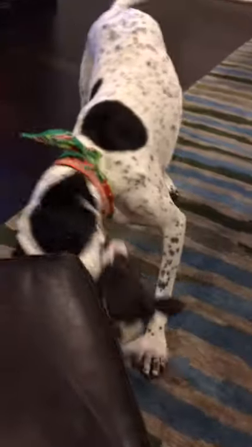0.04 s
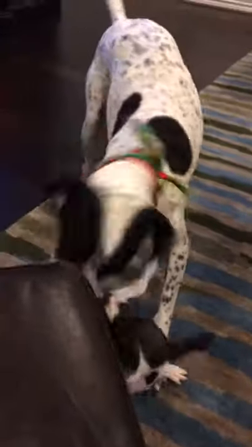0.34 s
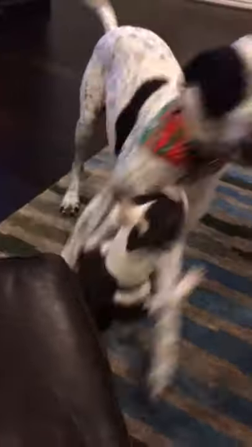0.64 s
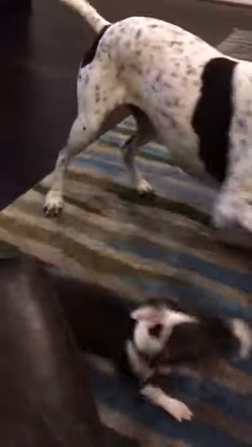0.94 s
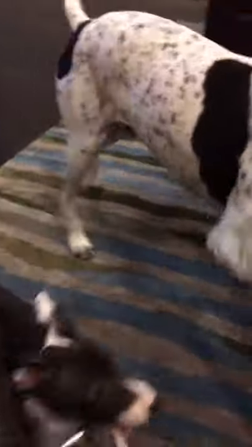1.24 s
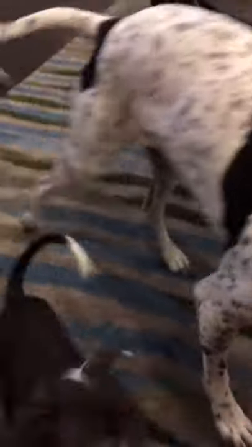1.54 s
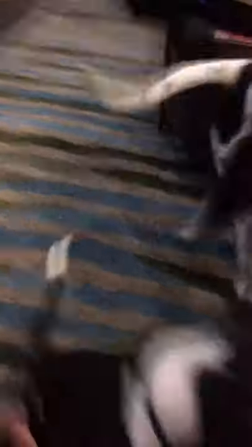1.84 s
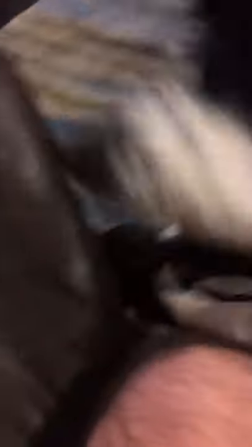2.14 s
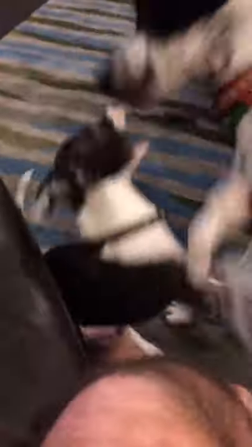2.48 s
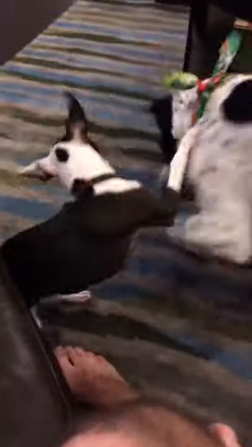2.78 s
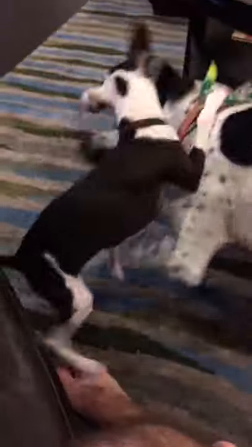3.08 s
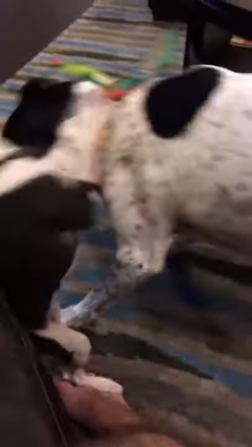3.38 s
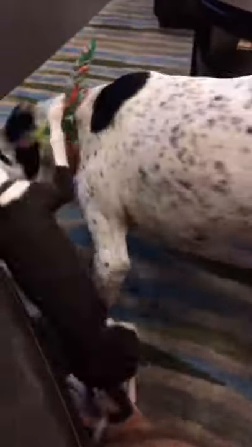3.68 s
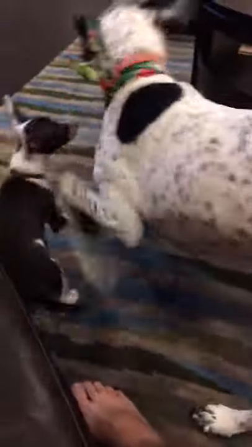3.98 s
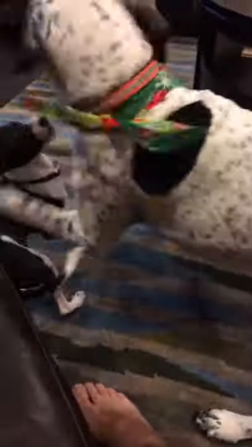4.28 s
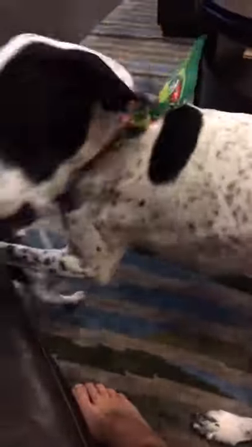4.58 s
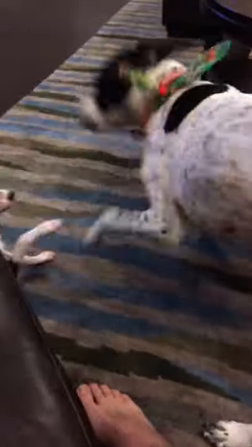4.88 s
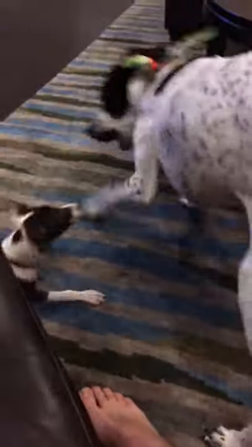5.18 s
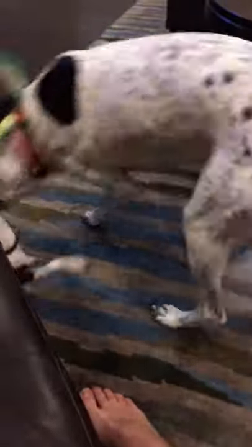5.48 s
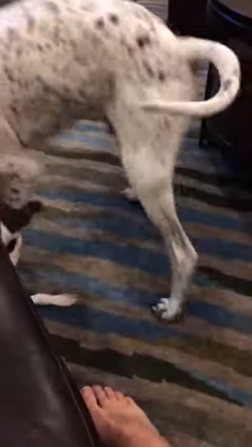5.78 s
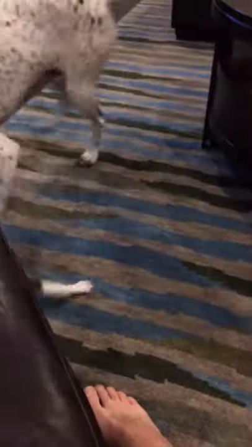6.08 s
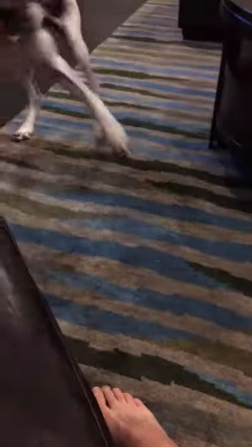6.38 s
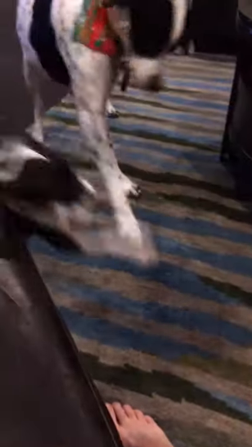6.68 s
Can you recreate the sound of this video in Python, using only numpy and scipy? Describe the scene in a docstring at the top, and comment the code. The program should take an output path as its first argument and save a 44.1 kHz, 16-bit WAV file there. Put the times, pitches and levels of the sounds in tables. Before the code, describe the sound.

Two dogs play-fight on carpet, close to a phone, in a room with a short echo. A metal collar tag clinks brightly and irregularly throughout, over faint shuffling, rustling fur and soft huffs. Three short, low growls fill the first second, with a sharp snap of teeth at 0.75 seconds. A loud, rough snarl runs from 1.3 to 1.8, briefly breaking into a whine. Around 2 seconds come dull thumps, snaps and a loud clink, then short growls until 2.6. A second snarl lasts from 2.9 to 3.3, followed by a clink and a whiny growl at 3.5. A strong knock at 4.1 starts the third snarl, ending in a sharp clink at 4.6. The dog snorts once near 4.9. The fourth snarl, edged with whines, runs from 5.6 to 6.2. A last short growl comes near 6.5, with jingling until 6.8.

```python
"""A low growl and the clink of collar tags: two dogs play-fight on a living-room carpet, near a phone. One
growls in short swells, snarls at length four times, may break into a whine, and snorts once. Its vocal folds
slap together and let air through, which sets its chest and throat ringing. The metal tags are struck with every
lunge; teeth snap, dull thumps sound, fur rustles, and the room adds a short echo."""
import sys
import numpy as np
from scipy import signal
from scipy.fft import rfft, irfft, next_fast_len
from scipy.io import wavfile
from scipy.ndimage import uniform_filter1d, map_coordinates

SR = 44100
rng = np.random.default_rng(int(sys.argv[2]) if len(sys.argv) > 2 else 0)


def dump(signal):
    """Clip the signal to [-1, 1] and save it as 16-bit WAV at the path in sys.argv[1]."""
    limited = np.clip(np.atleast_2d(signal).T, -1, 1)
    pcm = np.round(limited * 32767).astype(np.int16)
    wavfile.write(sys.argv[1], SR, pcm)


N = 305613

# Short growls, each swelling to one crest. Roughness and air (the share of breath noise) run from 0 to 1.
# start_s, rise_s, length_s, chest_db, mouth_db, teeth_db, swell_db, lip_curl_db, pitch_hz, roughness,
# air, then the throat's resonances: first_hz, second_hz, third_hz
GROWLS = [(-.03, 0.14, 0.28, -30.5, -42, -49.5, 1, -5, 116.5, 0.42, 0.75, 610, 870, 1540),
          (0.213, 0.15, 0.22, -32.5, -39.5, -52, 3, 11, 117.9, 0.49, 0.86, 680, 874, 1400),
          (0.741, 0.23, 0.33, -26, -29.5, -47, 14, 24.5, 104.1, 0.22, 0.6, 660, 908, 1630),
          (2.02, 0.032, 0.23, -21.5, -37, -36, 9, -50, 88.9, 0.32, 0.7, 599.8, 904, 1640),
          (2.218, 0.11, 0.21, -28.5, -44.5, -71, 10, -4, 84.54, 0.34, 0.99, 504, 980, 1477),
          (2.394, 0.094, 0.17, -26.5, -44.5, -67, 8, 36, 103.5, 0.68, 0.67, 750, 1015, 1780),
          (3.509, 0.11, 0.1665, -25, -35, -48, 9, -8, 113, 0.55, 0.42, 683.5, 880, 1822),
          (3.679, 0.031, 0.081, -35.5, -55, -56, 14, 8, 150.1, 0.22, 0.2, 684, 870, 1810),
          (6.361, 0.16, 0.26, -31.5, -39.5, -50.5, 5, 17.5, 86.14, 0.42, 0.96, 666, 946, 1514)]
# How strong the long snarls are, one list each: time_s, chest_db, mouth_db, teeth_db
SNARL_LEVELS = [
    [(1.32, -38, -30, -53), (1.33, -26, -37, -51), (1.38, -26, -19.5, -30.5), (1.436, -29, -23.5, -32),
     (1.51, -22, -17, -39), (1.532, -26, -16, -31.5), (1.574, -28, -24, -44), (1.6, -21.5, -20.5, -33),
     (1.678, -22, -25, -36.5), (1.7, -22, -19.5, -29), (1.726, -18.5, -30, -37), (1.754, -30, -25.5, -21),
     (1.81, -57, -52, -63)],
    [(2.92, -44, -66, -69), (2.934, -37, -48, -74), (2.944, -31, -50, -49), (2.964, -21, -30.5, -47),
     (2.98, -29, -25, -47), (3.048, -24.5, -35, -46), (3.054, -25.5, -23, -42.5), (3.12, -28, -36, -41.5),
     (3.182, -32, -26.5, -50), (3.224, -28.5, -37, -48), (3.248, -27, -31, -50), (3.298, -39, -47, -55),
     (3.33, -43, -56, -73)],
    [(4.11, -35, -42.5, -62), (4.132, -27, -41, -52), (4.214, -28, -37.5, -40.5),
     (4.374, -32, -42.5, -50.5), (4.436, -28, -42, -51), (4.44, -18.5, -39, -50),
     (4.446, -27.5, -35.5, -44), (4.482, -27.5, -27.5, -42), (4.488, -21.5, -23, -39),
     (4.522, -26.5, -31.5, -37), (4.534, -32, -26.5, -27), (4.564, -45, -49, -37.5), (4.59, -47, -47, -48)],
    [(5.575, -45, -65, -44), (5.587, -40, -47, -48), (5.605, -30, -20.5, -33), (5.687, -26.5, -32.5, -43.5),
     (5.747, -26.5, -30, -59), (5.791, -34, -24, -32), (5.817, -28, -35, -41), (5.865, -37, -31.5, -37),
     (5.935, -26.5, -34, -46), (6.003, -31.5, -25.5, -37), (6.053, -29, -27, -47.5),
     (6.115, -29, -30.5, -37.5), (6.22, -54, -55, -55)],
]
# Their voice, one list each: time_s, pitch_hz, roughness, air, first_hz, second_hz, third_hz
SNARL_VOICES = [
    [(1.33, 96.4, 0.3, 0.71, 585.8, 895, 1790), (1.39, 122, 0.79, 0.53, 618, 954, 1710),
     (1.44, 124.1, 0.79, 0.5, 584, 950, 1600), (1.53, 130.1, 0.96, 0.76, 537, 840, 1390),
     (1.68, 137.7, 0.58, 0.9, 523, 990, 1340), (1.74, 129.9, 0.6, 1, 637, 929.4, 1393),
     (1.79, 80.9, 0.63, 0.94, 730, 961, 1560)],
    [(2.96, 118.2, 0.74, 0.58, 742.5, 980.5, 1498), (3.06, 121.9, 0.82, 0.61, 734, 975.4, 1530),
     (3.12, 118.4, 0.78, 0.52, 729.3, 930, 1621), (3.18, 119.8, 0.71, 0.47, 673, 875, 1554),
     (3.28, 111.8, 0.75, 0.48, 690.3, 865, 1600)],
    [(4.13, 118.1, .8, 0.73, 641.5, 1005, 1499), (4.25, 100, 0.98, 0.73, 704.6, 1043, 1582),
     (4.4, 112.2, .9, 0.71, 653, 975.7, 1449), (4.48, 135.7, 0.92, 0.46, 632, 975.7, 1378),
     (4.54, 148.6, 1.02, 0.79, 753.4, 1066, 1537)],
    [(5.62, 112, .5, 0.4, 625, 738, 1760), (5.7, 108, 0.7, 0.39, 640, 750, 1799),
     (5.78, 110.3, 0.78, 0.4, 596, 700, 1502), (5.86, 115, 0.58, 0.5, 561, 1040, 1300),
     (5.96, 110.1, 0.5, 0.91, 668.8, 1015, 1351), (6.04, 109.8, 0.79, 0.5, 665.8, 958.5, 1371),
     (6.14, 110.4, 0.76, 0.84, 681, 1053, 1560)],
]
# High, arching whines: start_s, rise_s, length_s, top_pitch_hz, sag_hz_per_s, roughness, air
WHINES = [(1.466, 0.049, 0.097, 300.3, 280, 0.26, 0.16), (1.595, 0.021, 0.12, 267.6, 380, .34, 0.44),
          (3.591, 0.004, 0.16, 214.5, 310, 0.11, 0.36), (5.805, 0.071, .15, 247.1, 161, 0.2, 0.2),
          (5.99, 0.035, .08, 223.6, 11.7, 0.23, 0.2), (6.125, 0.022, 0.1, 224.5, 20, .2, 0.65)]
# A hard slap of the vocal folds with a brief push through the mouth: time_s, push_db
JOLTS = [(.986, 7), (1.399, 4.5), (2.996, 4.5), (4.466, 9), (4.487, 1.5), (5.606, -3), (5.64, 1.5),
         (5.719, 7.5), (5.779, 0)]
# How strong the snort is: time_s, mouth_db, teeth_db, nose_db
SNORT_LEVELS = [(4.815, -46, -66, -70), (4.835, -37, -48, -65), (4.856, -28.5, -33.5, -51),
                (4.888, -34, -39, -41), (4.906, -30, -36, -34.5), (4.945, -33, -39, -42),
                (4.975, -32.5, -42.5, -55), (5.01, -31, -54, -47), (5.025, -43, -53, -59),
                (5.08, -61, -68, -72)]
# Its resonances, shifting as the lips draw back: time_s, first_hz, second_hz, third_hz
SNORT_RESONANCES = [(4.83, 690, 1220, 2650), (4.87, 868, 1467, 2900), (4.91, 690, 1670, 3250),
                    (4.96, 630, 1620, 3260), (5.01, 850, 1680, 2600)]
# The tone of the hiss in the nose: frequency_hz, level_db
NOSE_TONE = [(2500, -21), (4900, 2), (6300, 3), (7400, -1), (12000, -3), (15000, -7.5)]
# Short breaths between growls: middle_s, length_s, level_db, resonance_hz
HUFFS = [(0.594, 0.14, -44.5, 667), (1.206, 0.36, -52, 800), (2.401, 0.07, -44, 950),
         (2.837, 0.07, -41, 726), (3.406, 0.14, -42.5, 734.6), (5.261, 0.21, -45.5, 849.5)]
# Hits on the tag. Low, main and high are its groups of notes; ring_share scales their ring time.
# time_s, peak_db, low_db, main_db, high_db, favoured_hz, ring_share
CLINKS = [(0.164, -28.5, -28, 0, -28, 11500, 0.61), (0.4357, -23, -16, -7, -7, 14000, 1),
          (0.5116, -27.5, -37, -11, -12, 13400, 0.38), (0.6385, -8.5, -7.5, -7, -1.5, 11250, 0.19),
          (0.6566, -15.5, -10, -5, -11, 11350, 0.18), (0.9367, -28, -34, -30, -14, 9960, 0.31),
          (1.15, -34, -8, -12, -5, 11330, 0.53), (1.3699, -18.5, -23, -9.5, -22, 12710, 0.59),
          (1.472, -21.5, -17, -23, -3.5, 13400, 0.5), (1.961, -3.5, -12.5, -9, -8, 13400, 0.8),
          (1.995, -12.5, -9, -32, -2, 9775, 0.63), (2.0203, -12, -18, -16, -3, 12000, 0.65),
          (2.045, -21, -4, -16, -8, 9775, 1), (2.139, -12.5, -9, -21.5, 0.5, 11530, 0.17),
          (2.3371, -13.5, -28, -7, -5, 12700, 0.2), (2.373, -23, -21, 1, -23, 12720, 0.2),
          (2.4067, -14.5, -10, -12.5, -14, 12700, 0.27), (2.4595, -18.5, -20, -1, -1, 13530, 0.37),
          (2.945, -31.5, -7, -10, -16, 13640, .7), (3.4822, -10, -17, -22, -6.5, 12860, 0.44),
          (3.686, -29.5, -6, -16, -14, 14930, 1), (3.9805, -22, -15, 0, -21, 12780, 0.85),
          (4.031, -26.5, -21, -7, -6, 13400, 0.49), (4.2371, -28.5, -12, -15, -11, 11380, 1),
          (4.255, -22, -9.5, -10, -1, 13400, 0.76), (4.6031, -6, -8, 1, -32, 12690, 0.71),
          (4.643, -18.5, -19, -5, -16, 12690, 0.72), (4.9528, -17, -21, -5, -22, 9300, 0.51),
          (5.282, -20.5, -11, 0, -8, 11440, 0.38), (5.5511, -27.5, -21, -13, -31, 12580, 0.56),
          (5.6188, -16, -25.5, -31, -17, 13420, 0.6), (5.691, -16.5, -16, -16, -9, 12680, 0.41),
          (5.843, -21.5, -13, -8, -4.5, 11410, 0.98), (6.0612, -20.5, -16, -7.5, -12, 11440, 1),
          (6.3257, -17, -18, -10, -7, 11500, 0.23), (6.345, -20, -7, -10, -6, 11520, 0.39),
          (6.459, -6, -25, -9.5, -1.5, 11330, 0.43), (6.482, -35, -20, -25, -12, 13700, 0.33),
          (6.495, -21, -9, -17, -3, 9850, 0.64), (6.5231, -17, -30, -3, -8, 11500, 0.089),
          (6.751, -12.5, -21, -13.5, -11, 12700, 0.53), (6.768, -18, -12, -15, -22, 12700, 0.65),
          (6.796, -18, -21, -7, -9, 12700, 0.43)]
# The notes the two free tags ring at, each paired with a high note of the same tag (a ring time is a fade of 60
# dB): pitch_hz, level_db, ring_s, partner_hz
TAG_NOTES = [(3960, -9, .07, 13415), (4975, -10, .1, 11460), (5425, -12, .24, 12690), (8470, -4, .09, 8470),
             (8505, -1, .16, 8505), (9775, -9, .08, 9775), (11460, -3, .11, 11460), (12690, -5, .11, 12690),
             (13415, -6, .06, 13415), (13700, -6, .08, 13700)]
# The tag slides along the collar ring: middle_s, half_length_s, level_db
SCRAPES = [(.245, 0.024, -38), (2.07, 0.024, -31), (3.52, 0.037, -39), (.84, 0.036, -40.5),
           (2.115, 0.015, -39), (5.68, 0.052, -41)]
# The notes the buckle rings at: pitch_hz, level_db, ring_s
BUCKLE_NOTES = [(5800, -9, 0.059), (6360, -4.5, 0.12), (7140, -7.5, 0.048), (14700, -6.5, 0.05)]
# Taps on the buckle: time_s, peak_db
BUCKLE_TAPS = [(.385, -34), (.42, -31), (.755, -35), (0.791, -31.5), (1.035, -34), (2.46, -22),
               (2.528, -29.5), (2.612, -35.5), (2.639, -31.5), (3.483, -31), (5.446, -31)]
# Teeth snapping shut: time_s, peak_db, pitch_hz
SNAPS = [(0.7517, -5.5, 8747), (1.994, -20, 8800), (1.9958, -23.5, 3146), (2.022, -26, 3779),
         (2.173, -30.5, 2400), (2.489, -31.5, 2333), (3.481, -31, 3400), (3.4861, -25, 7625),
         (3.835, -41, 4190), (4.069, -36, 10500), (4.306, -33.5, 3914), (6.321, -30, 3588),
         (6.456, -27, 3800), (6.494, -36, 4210)]
# Dull low thumps and knocks, including the chesty grunt pulses that start a growl and the snort:
# time_s, level_db, pitch_hz
THUMPS = [(0.69, -36, 189.9), (1.945, -19, 210.7), (2.027, -16.5, 170), (2.088, -21, 300),
          (2.1055, -15, 240), (3.482, -31.5, 129.3), (4.068, -7, 394), (4.779, -35, 128.5),
          (4.82, -21.5, 231), (4.829, -20, 150), (4.837, -17.5, 170), (6.665, -36, 255)]
# Teeth and claws rake the collar strap: middle_s, half_length_s, level_db
RAKES = [(2.015, 0.027, -33.5), (2.085, 0.03, -50.5), (3.495, 0.018, -32.5), (3.562, 0.018, -43),
         (6.49, 0.026, -43.5)]
# The bodies rub together: middle_s, half_length_s, strength_db
RUBS = [(0.828, 0.12, -50), (2.5, 0.33, -61.5), (3.594, 0.059, -52.5), (4.87, 0.34, -61), (5.79, 0.17, -50),
        (6.565, 0.16, -55.5)]
# The tones of shuffling feet, brushed carpet and rustling fur: frequency_hz, level_db
FEET_TONE = [(20, -2), (45, -20), (80, -0.5), (200, -2), (350, -47), (800, -71)]
CARPET_TONE = [(100, -34), (300, 13.5), (700, 14.5), (1100, 3.5), (2000, 6.5), (4000, 2), (9000, -5.5)]
FUR_TONE = [(1470, 5.5), (2500, -10.5), (3500, -6), (4820, -9), (6390, -2), (7110, -3.5), (8480, -2),
            (10800, -10.5), (13200, -1), (15500, -10)]
# How long the room's echo lasts: frequency_hz, ring_s
ROOM_RING = [(100, 0.39), (700, 0.76), (3000, 0.51), (12000, 0.16)]

BREAK_S = .02  # fade time of snarls, whines and the snort


def growl(chest_hz=(94.4, 202.4), upper_hz=(2388, 3240)):
    """The chest gives off low pulses; an open mouth adds the throat's ring, bared teeth its top notes."""
    (chest_gain, mouth_gain, teeth_gain), (pitch, rough, air), (first, second, third) = growl_controls()
    slaps, rasp, air = vocal_folds(pitch, rough, air)
    push = steady(slaps) + 0.22 * rasp
    tension = (pitch / 110) ** 0.2 * np.exp(.04 * wobble(45))
    # the closed muzzle hums an octave above the chest, more so when the voice is pressed hard
    muzzle = (1.15 - air) * amp(7) * resonate(push, chest_hz[1] * tension, 59)
    chest = band(resonate(push, chest_hz[0] * tension, 52.5) - muzzle, 45.5, 299, order=5)
    # the second resonance comes forward as the jaw drops and the voice turns airy
    second_db = -8 + .06 * (first - 680) + 8 * air
    throat = resonate(rasp, first, 80) - amp(second_db) * resonate(rasp, second, 60)
    mouth = band(throat, 351, 1310, order=4)
    # rushing air stirs the highest resonances most
    edge = amp(-10.5) * resonate(rasp, upper_hz[0], 170) - amp(-19) * resonate(rasp, upper_hz[1], 300)
    teeth = band(resonate(rasp, third, 152) - (0.023 + air) * edge, 1120, 3380, order=4)
    # in a hard snarl, loose tissue rattles at its own uneven rate and shakes the throat's walls
    rattle = vocal_folds(pitch_hz=95, rough=.9, air=.4)[1]
    murmur = amp(11.5) * mouth_gain ** 2.05 * steady(band(rattle, 84, 475))
    return (amp(-0.5) * chest_gain * steady(chest) + amp(0.5) * mouth_gain * steady(mouth)
            + amp(-3) * teeth_gain * steady(teeth) + murmur)


def growl_controls(attack_s=.03, release_s=.05, mouth_lag_s=0.0023, octaves_per_db=0.38):
    """Effort shapes gains (chest, mouth, teeth), voice (pitch, roughness, air) and throat resonances."""
    t, gains = np.arange(N) / SR, np.zeros((3, N))
    points = [tuple(row) for snarl in SNARL_VOICES for row in snarl]
    for start, rise, length, chest_db, mouth_db, teeth_db, swell_db, curl_db, hz, *shape in GROWLS:
        crest, end = start + rise, start + length
        envelope = gate(start, end, attack_s, release_s)
        on = np.flatnonzero(envelope)
        effort_db = swell(t[on], start, crest, end, swell_db)
        bared_db = curl_db * np.exp((t[on] - end) / 0.084)  # the lips curl as the growl ends
        opening = gate(start + mouth_lag_s, end, attack_s, release_s)
        gains[0, on] += envelope[on] * amp(chest_db + effort_db)
        gains[1, on] += opening[on] * amp(mouth_db + 1.73 * effort_db)
        gains[2, on] += opening[on] * amp(teeth_db + effort_db + bared_db)
        for s in (start + attack_s / 2, crest, end - release_s):
            octaves = octaves_per_db * swell(s, start, crest, end, swell_db)
            points.append((s, hz * 2 ** octaves, *shape))
    for snarl in SNARL_LEVELS:
        gains += amp(curves(snarl)) * gate(snarl[0][0], snarl[-1][0], BREAK_S / 2, BREAK_S)
    push = np.ones(N)
    for s, db in JOLTS:
        add(push, s, (amp(db) - 1) * np.exp(-t[:SR // 10] / 0.012))
    gains[1] *= push
    voice, throat = np.split(curves(sorted(points)), 2)
    tremor = amp(1.2 * wobble(45))
    jaw_wander = np.exp(0.025 * np.array([wobble(30) for _ in throat]))
    return gains * tremor, with_whines(voice), throat * jaw_wander


def swell(t, start, crest, end, depth_db):
    """A growl's effort in dB: it climbs to the crest and falls away at the same pace."""
    return -depth_db * np.abs(t - crest) / max(crest - start, end - crest)


def with_whines(voice):
    """The voice breaks into a high, smoother note that arches up and down."""
    t = np.arange(N) / SR
    for start, rise, length, top_hz, sag, rough, air in WHINES:
        pitch = top_hz - sag * np.abs(t - (start + rise))
        blend = gate(start - BREAK_S / 2, start + length + BREAK_S / 2, BREAK_S, BREAK_S)
        for control, target in zip(voice, (pitch, rough, air)):
            control += blend * (target - control)
    return voice


def vocal_folds(pitch_hz, rough, air, scatter_db=4, flutter_hz=62, flutter_db=5):
    """The folds slap shut and let puffs through. Gives the slaps, slaps plus air, and the air's share."""
    rough, air = np.clip(rough, 0, 1), np.clip(air, .01, .99)
    jitter = .008 + .34 * rough ** 1.5 * np.minimum(1, 110 / pitch_hz) ** .7  # high voices are steadier
    cycles = np.cumsum(pitch_hz * np.exp(jitter * wobble(110))) / SR
    at = np.flatnonzero(np.diff(np.floor(cycles)))
    # loose tissue above the folds flaps slowly and makes the slaps uneven
    flutter = np.sin(2 * np.pi * np.cumsum(flutter_hz * np.exp(0.2018 * wobble(30))) / SR)
    slaps = np.zeros(N)
    slaps[at] = amp(np.sqrt(rough) * (scatter_db * np.tanh(wobble(300)) + flutter_db * flutter))[at]
    jolted = slaps.copy()
    for s, _ in JOLTS:
        add(jolted, s, amp([6]))
    puffs = rng.standard_normal(N) * (0.87 + np.exp(-4 * (cycles % 1)))
    rasp = np.sqrt(1 - air) * steady(jolted) + np.sqrt(air) * steady(puffs)
    return slaps, rasp, air


def snort(flap_hz=41, flap_db=3):
    """The lips flap while ragged air rings the mouth, rasps between the teeth and hisses in the nose."""
    flap = amp(flap_db * np.cos(2 * np.pi * flap_hz * (np.arange(N) / SR - 4.857)))
    ragged = amp(3 * np.tanh(wobble(420)))
    air = rng.standard_normal(N) * ragged
    first, second, third = curves(SNORT_RESONANCES)
    mouth = band(resonate(air, first, 170) - resonate(air, second, 260), 300, 2200)
    teeth = band(resonate(air, third, 1700), 1780, 4400, order=3)
    nose = noise(NOSE_TONE) * ragged
    layers = amp(curves(SNORT_LEVELS)) * [steady(mouth), steady(teeth), steady(nose)]
    return layers.sum(0) * flap * gate(SNORT_LEVELS[0][0], SNORT_LEVELS[-1][0], BREAK_S, BREAK_S)


def huffs():
    """A dog pants through its open mouth: soft air in two resonances."""
    out = np.zeros(N)
    for s, length, db, hz in HUFFS:
        air = rng.standard_normal(SR // 2)[:int(length * SR)]
        huff = band(air, hz * 0.89, hz * 1.24) + 0.15 * band(air, hz * 1.76, hz * 2.75)
        add(out, s - length / 2, amp(db) * unit(huff) * np.sqrt(np.hanning(len(air))))
    return out


def collar_tag(bounces_per_s=310, choke_db=-6):
    """Each hit cracks, clashes and rings; quick bounces renew it, and the next listed hit damps it."""
    out, t = np.zeros(N), np.arange(SR // 5) / SR
    for s, db, *hit in list(CLINKS) + jingles():
        ring = tag_ring(t, *hit)
        crack = band(rng.standard_normal(len(t)), 1700, 11700, order=1) * amp(-18) * fade(t, 0.017)
        clash_hz = rng.triangular(3000, 13000, 15400, (18, 1))
        clash = np.sin(2 * np.pi * clash_hz * t).sum(0) * amp(-24) * fade(t, .035)
        strike = (ring + crack + clash) * (1 - np.exp(-t / 0.000077))
        bouncing = rng.random(len(t)) < bounces_per_s / SR
        bounces = bouncing * rng.standard_normal(len(t)) * amp(-8) * fade(t, 0.11)
        bounces[0] = 1  # the hit itself
        clink = signal.fftconvolve(strike, bounces)[:len(t)]
        gap_s = min([row[0] - s for row in CLINKS if row[0] > s], default=1)
        clink *= amp(choke_db * np.clip((t - gap_s) / .004, 0, 1))
        add(out, s, at_peak(clink, db))
    return out


def tag_ring(t, low_db, main_db, high_db, favoured_hz, ring_share):
    """The two tags ring at several notes at once; where they are hit decides which ring most."""
    hz, note_db, free_ring_s, partner_hz = np.transpose(TAG_NOTES)[:, :, None]
    group_db = np.where(hz < 7000, low_db - 3.5, np.where(hz < 9000, main_db + 8, high_db - 4.5))
    favour_db = 12 * np.exp(-((partner_hz - favoured_hz) / 210) ** 2)
    size, detune, phase, grip = rng.standard_normal((4, len(TAG_NOTES), 1))
    gain = amp(note_db + group_db + favour_db + 3.5 * np.tanh(size))
    ring_s = free_ring_s * max(ring_share, .05) * 1.35 ** np.tanh(grip)
    notes = np.sin(2 * np.pi * (hz * (1 + 0.0023 * detune) * t + phase))
    muffle = 0.55 + 0.15 * np.exp(-t / 0.006)  # fur and collar soon swallow part of the ring
    return np.sum(gain * fade(t, ring_s) * notes, 0) * muffle


def jingles(per_s=3, peak_db=-41, spread_db=4):
    """The swinging tag gets light hits at random times, given as rows like those of CLINKS."""
    draws = rng.random((int(per_s * N / SR), 2))
    return [(when * N / SR, peak_db + spread_db * (2 * size - 1), -12, -20, -6, 13400, 0.3)
            for when, size in draws]


def scrapes(slips_per_s=830, low_hz=7700, high_hz=14800):
    """Metal slides on metal in tiny slips that keep the tag's upper notes ringing."""
    slips = rng.standard_normal(N) * (.08 + (rng.random(N) < slips_per_s / SR))
    ring = sum(signal.lfilter(*signal.iirpeak(hz, 90, SR), slips) for hz, *_ in TAG_NOTES if hz > low_hz)
    return strokes(SCRAPES) * unit(unit(band(slips, low_hz, high_hz)) + amp(2) * unit(ring))


def buckle():
    """Each tap makes the collar's buckle tick and ring at its own notes."""
    out, t = np.zeros(N), np.arange(SR // 5) / SR
    for s, db in BUCKLE_TAPS:
        ring = sum(amp(note_db + rng.normal(0, 3)) * fade(t, ring_s) * np.sin(2 * np.pi * hz * t)
                   for hz, note_db, ring_s in BUCKLE_NOTES)
        tick = amp(2) * fade(t, .01) * band(rng.standard_normal(len(t)), 4000, 14000, order=1)
        add(out, s, at_peak(ring + tick, db))
    return out


def teeth_snaps():
    """Teeth meet in a dry clack."""
    out, t = np.zeros(N), np.arange(SR // 20) / SR
    for s, db, hz in SNAPS:
        clack = band(rng.standard_normal(len(t)) * fade(t, 0.029), hz * 0.66, hz * 1.34)
        add(out, s, at_peak(clack, db))
    return out


def thumps():
    """Dull thumps, knocks and chesty grunt pulses: one push that dies quickly, plus a low noisy thud."""
    out, t = np.zeros(N), np.arange(SR // 10) / SR
    for s, db, hz in THUMPS:
        push = np.sin(2 * np.pi * hz * t) * t * np.exp(-2.8 * hz * t)
        thud = band(rng.standard_normal(len(t)), 230, 520, order=1) * fade(t, 0.04)
        add(out, s, at_peak(push, db) + 1.1 * amp(db) * thud)
    return out


def rakes(crackles_per_s=650, low_hz=2620, high_hz=12840):
    """The raked collar strap catches and lets go in dense, dry crackles, each at its own pitch."""
    out, t = np.zeros(N), np.arange(SR // 100) / SR
    for when, size, pitch in rng.random((int(crackles_per_s * N / SR), 3)):
        hz = low_hz * (high_hz / low_hz) ** pitch
        add(out, when * N / SR, size ** 2 * np.sin(2 * np.pi * hz * t) * fade(t, 0.015))
    return strokes(RAKES) * steady(out)


def claw_ticks(per_s=16):
    """Claws catch in the carpet and the collar strap creaks: scattered dry ticks."""
    out, t = np.zeros(N), np.arange(SR // 30) / SR
    for when, softness, pitch in rng.random((int(per_s * N / SR), 3)):
        hz = 3500 * 3.5 ** pitch
        tick = band(rng.standard_normal(len(t)) * fade(t, .025), hz * .6, hz * 1.5, order=1)
        add(out, when * N / SR, at_peak(tick, -50 - 4.5 * np.log(softness + .05)))
    return out


def scuffle():
    """Feet shuffle on the floor, bodies brush the carpet, fur and collar rustle in small grains."""
    rub_db = 20 * np.log10(amp(-60.5) + strokes(RUBS))  # rubs on top of a steady rustle
    feet = amp(-50.5 + 0.5 * (rub_db + 45.5) + 1.6 * wobble(2.94)) * noise(FEET_TONE)
    carpet = amp(-60 + 3 * wobble(15)) * noise(CARPET_TONE)
    rustle = unit(noise(FUR_TONE) * amp(3 * wobble(40) + 2.5 * wobble(700)))
    # the swinging tag keeps brushing the buckle, so their longest notes shimmer faintly
    shimmer = sum(amp(db + 6 * wobble(14)) * resonate(rng.standard_normal(N), hz, 40)
                  for hz, db, ring_s, *_ in list(BUCKLE_NOTES) + list(TAG_NOTES) if ring_s > .115)
    return feet + carpet + amp(rub_db + 5.5) * (rustle + amp(-6.5) * unit(shimmer))


def room_echo(x):
    """The furnished room answers with a short echo whose highs die first."""
    hz, t, spectrum = signal.stft(rng.standard_normal(SR // 2), SR, nperseg=256)
    tail = signal.istft(spectrum * fade(t, along(ROOM_RING, hz)[:, None]), SR, nperseg=256)[1]
    return signal.fftconvolve(x, np.pad(tail / np.linalg.norm(tail), (250, 0)))[:N]


def amp(db):
    """Turn decibels into a gain."""
    return 10 ** (np.asarray(db) / 20)


def fade(t, ring_s):
    """A gain that falls 60 dB in ring_s."""
    return amp(-60 * t / ring_s)


def at_peak(x, db):
    """Scale x so that its peak is at db."""
    return amp(db) * x / np.abs(x).max()


def unit(x):
    """Scale x to an average (rms) level of 1."""
    return x / np.sqrt(np.mean(x ** 2) + 1e-20)


def steady(x):
    """Hold the slow level of x at 1; single pulses still vary in size."""
    power = uniform_filter1d(uniform_filter1d(x ** 2, size=1500), size=1500)
    return x / np.sqrt(np.abs(power) + 1e-6 * np.mean(x ** 2))


def gate(start, end, attack_s, release_s):
    """A gain that fades in, holds and fades out."""
    t = np.arange(N) / SR
    return np.clip(np.minimum((t - start) / attack_s, (end - t) / release_s), 0, 1)


def strokes(rows):
    """A gain that swells and fades once for each row."""
    t = np.arange(N) / SR
    return sum(amp(db) * np.exp(-np.minimum(((t - s) / half) ** 2, 20)) for s, half, db in rows)


def along(points, hz):
    """Read between (frequency_hz, value) points on a log scale."""
    point_hz, values = np.transpose(points)
    return np.interp(np.log(hz + 1), np.log(point_hz + 1), values)


def curves(rows):
    """Join timed rows into one curve for each column after the time."""
    times, *columns = np.transpose(rows)
    return np.array([np.interp(np.arange(N) / SR, times, column) for column in columns])


def wobble(per_s):
    """A smooth curve through per_s random points a second."""
    at = np.linspace(0, N * per_s / SR, int(N * per_s / SR * 10))
    smooth = map_coordinates(rng.standard_normal(int(at[-1]) + 4), [at])
    return np.interp(np.arange(N) * per_s / SR, at, smooth)


def filtered(x, response):
    """Scale each frequency in x by response(hz)."""
    size = next_fast_len(N + SR // 2)
    return irfft(rfft(x, size) * response(np.fft.rfftfreq(size, 1 / SR)), size)[:N]


def noise(tone):
    """Noise at level 1, shaped by a tone table."""
    return unit(filtered(rng.standard_normal(N), lambda hz: amp(along(tone, hz))))


def band(x, low_hz, high_hz, order=2):
    """Keep the frequencies between low_hz and high_hz."""
    sections = signal.butter(order, [low_hz, min(high_hz, SR / 2 - 1)], "band", fs=SR, output="sos")
    return signal.sosfilt(sections, x)


def resonate(x, hz, width_hz):
    """A resonance: x rings at hz, which is one number or a moving curve."""
    turn = np.exp(2j * np.pi * np.cumsum(np.broadcast_to(hz, N)) / SR)
    pole = np.exp(-np.pi * width_hz / SR)
    return (signal.lfilter([1 - pole], [1, -pole], x / turn) * turn).real


def add(track, s, sound):
    """Mix a sound in at s seconds."""
    part = track[max(round(s * SR), 0):][:len(sound)]
    part += sound[:len(part)]


def scene():
    """Voice, clatter and thumps with their echo, over the quiet scuffle."""
    voice = growl() + snort() + huffs()
    clatter = collar_tag() + buckle() + teeth_snaps() + scrapes() + rakes() + claw_ticks()
    knocks = thumps()
    echo = room_echo(amp(-15) * (voice + clatter) + amp(-18) * knocks)
    return (voice + clatter + knocks + echo + scuffle())[None]


def record(dry, top_hz=15600):
    """The phone keeps nothing above top_hz."""
    return filtered(dry[0], lambda hz: hz < top_hz)[None]


dry = scene()
out = record(dry)
dump(out)
```